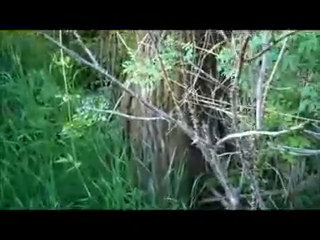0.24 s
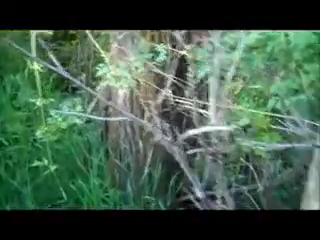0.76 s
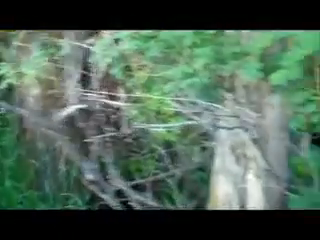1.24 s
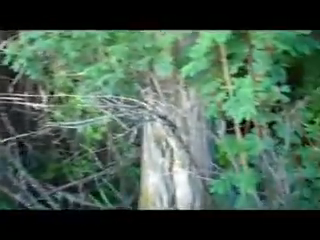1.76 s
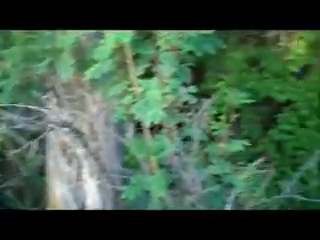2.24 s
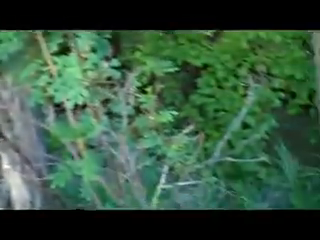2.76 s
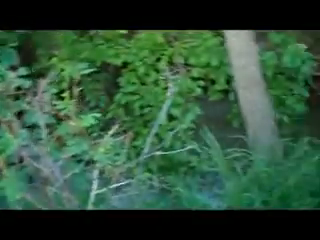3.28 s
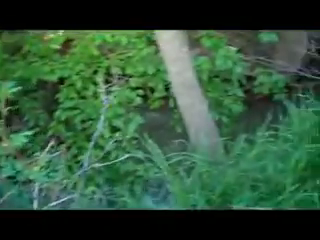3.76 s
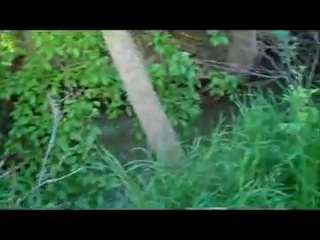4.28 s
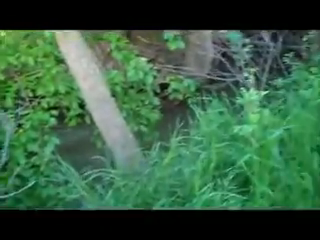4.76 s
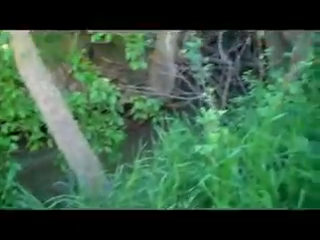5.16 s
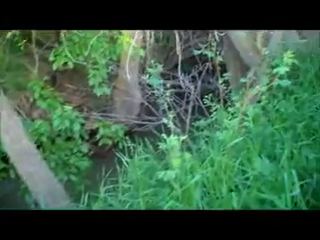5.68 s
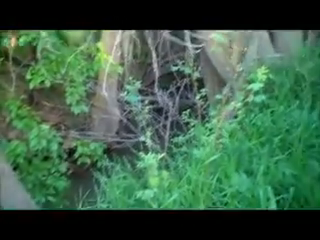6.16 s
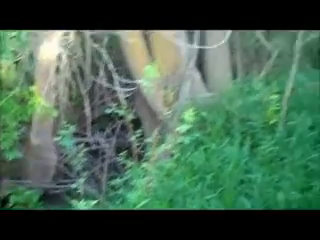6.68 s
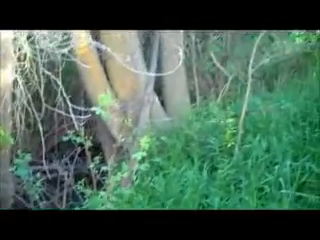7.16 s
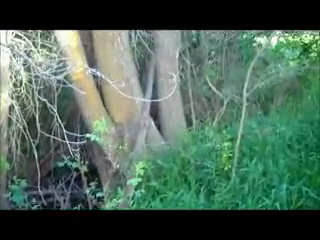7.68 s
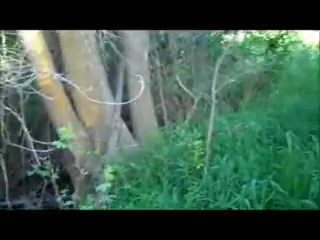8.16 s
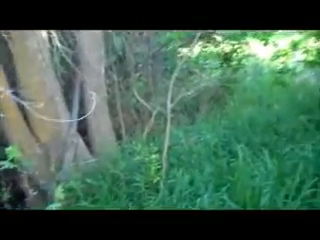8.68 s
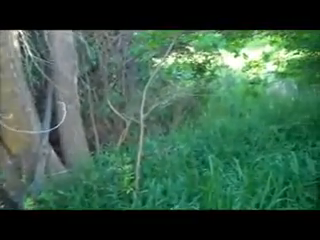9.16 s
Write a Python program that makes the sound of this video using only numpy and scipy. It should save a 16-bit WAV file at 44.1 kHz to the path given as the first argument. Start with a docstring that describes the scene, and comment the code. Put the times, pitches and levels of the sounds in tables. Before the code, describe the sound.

Water pours steadily over a gate into a ditch outdoors, a dense bubbling roar with small splashes and soft breeze thuds on the right.

```python
"""From the first moment water pours over a farm gate into an irrigation ditch: noise roars, bubbles ring over it.
Air thuds softly on the right microphone port from the start; brief treble lifts splash out until 5.6 s.
From about 2 s the water pulls left as the camera pans right, its left port leading by up to 0.1 ms.
The lows below 400 Hz dip or lift briefly on either port, deepest on the left at 3.4 s and 8.7 s.
After 8 s a few strong puffs reach the left too. Weak bands thin out for moments, leaving the sound patchy."""
import sys
import numpy as np
from scipy import signal
from scipy.fft import rfft, irfft, next_fast_len
from scipy.io import wavfile
from scipy.ndimage import uniform_filter1d

SR = 44100
rng = np.random.default_rng(int(sys.argv[2]) if len(sys.argv) > 2 else 0)


def transcribe(signal):
    """Save signal, clipped to [-1, 1], as a 16-bit WAV file at the path in sys.argv[1]."""
    frames = np.atleast_2d(signal).T
    limited = np.clip(frames, -1, 1)
    pcm = np.round(limited * 32767).astype(np.int16)
    wavfile.write(sys.argv[1], SR, pcm)


N = 415422
FRAME, HOP = 1024, 256  # short-time spectra, in samples
HZ = np.fft.rfftfreq(FRAME, 1 / SR)

# Colour of the falling water. Each row: pitch in [Hz], relative level in [dB].
WATER_COLOUR = [(40, -54), (90, -16.5), (130, -8.5), (170, -3), (220, 1.1), (310, 3), (460, 7), (590, 6.5),
                (750, 6), (950, 1.8), (1350, 3), (1900, 0.32), (2500, 0.4), (4000, -2), (6000, 0.5)]
# Splashes out of the rush. Each row: centre in [s], treble lift in [dB], half-length in [s].
SPLASHES = [(0.146, 1.5, .05), (0.65, 1.5, 0.016), (1.518, 1, .03), (1.96, 2.3, 0.024), (2.254, 2, 0.021),
            (2.676, 2.5, 0.019), (3.308, 2.5, .012), (4.4, 2.5, 0.01), (5.64, 2, 0.035)]
# The pan. Each row: time in [s], lead of the left port in [ms], shading in [dB], delay of the bank's echo in [ms],
# strength of the bank's echo [0-1], strength of the ground's echo [0-1].
CAMERA_PAN = [(0, 0.006, -0.5, 1.02, 0.62, 0.33), (1.7, 0.0033, 0.3, 1.015, 0.66, 0.41),
              (2.5, 0.024, -1, 1.015, 0.57, 0.48), (4, 0.069, 1, 1.004, 0.5, 0.35),
              (5.5, 0.057, 0, 0.97, 0.5, 0.36), (6.4, 0.083, 0, 0.99, 0.42, 0.33),
              (6.65, 0.097, 0.8, 0.99, 0.49, 0.32), (8, 0.1, -1, 0.91, 0.41, 0.29),
              (9.42, 0.097, -1.8, 0.88, 0.4, 0.14)]
# How much of the shading each pitch takes. Each row: pitch in [Hz], share [a factor, negative inverts].
SHADING_SHARE = [(500, -0.38), (1400, 0.28), (2400, 0.22), (5200, 0.65), (7000, 0.19)]
# Likeness of the two ports, the rest being scattered by trees. Each row: pitch in [Hz], correlation [0-1].
PORT_LIKENESS = [(100, 0.3), (250, 0.63), (900, 0.61), (1600, 0.57), (2500, 0.52), (4400, 0), (4600, 0.48),
                 (6600, 0.92), (7000, 0.03), (8000, 0.2)]
# Moments when the lows dip or lift briefly on either port. Each row: centre in [s], dip on the left in [dB],
# dip on the right in [dB], half-length in [s]; a negative dip is a lift.
LOW_DIPS = [(.3, 1, 2, 0.63), (1.2, 4, 7, 0.05), (1.62, 5, 4, 0.05), (3.387, 18, 2, 0.042),
            (3.48, -4, 2, .025), (3.85, 9, -2, .035), (3.96, 12, 9, 0.045), (4.363, 3, 6, .025),
            (4.747, 14, 0, .03), (5.153, -2, 6, 0.035), (5.297, 11, 3.5, 0.04), (5.697, 10, 2, .03),
            (6.564, 8, 2, .03), (7.268, 9, 5, .05), (7.8, 1, 0, .035), (8.24, 9, 5, 0.042),
            (8.403, 13, 8, 0.023), (8.71, 23, 1, 0.059), (9.35, 4, 7, .02)]
# How far up such a dip reaches. Each row: pitch in [Hz], share of the dip [0-1].
LOW_DIP_REACH = [(160, 1), (260, 0.38), (400, 0), (800, 0)]
# The band that stays centred, neither port leading: lower edge in [Hz], upper edge in [Hz].
CENTRED_BAND_HZ = (4520, 6800)
# Single puffs of air on the ports. Each row: centre in [s], left level in [dB], right level in [dB].
PUFFS = [(0.046, -68, -42), (0.105, -74, -35), (0.268, -70, -43), (0.334, -70, -40), (0.465, -70, -39),
         (0.515, -70, -38), (0.824, -70, -41), (1.529, -67, -38), (1.69, -70, -43), (1.738, -70, -43),
         (2.046, -70, -46), (2.193, -70, -41), (2.551, -65, -43), (2.891, -66, -47), (3.046, -70, -43),
         (3.145, -70, -39), (3.244, -70, -45), (3.323, -70, -45), (3.379, -70, -43), (3.601, -69, -46),
         (3.832, -70, -46), (4.893, -62, -42), (5.387, -70, -42), (5.435, -70, -49), (5.517, -66, -43),
         (5.719, -70, -41), (6.064, -70, -47), (6.127, -70, -45), (6.234, -70, -46), (6.415, -70, -46),
         (6.683, -67, -40), (6.756, -68, -36), (6.93, -70, -41), (7.286, -70, -42), (7.359, -70, -41),
         (7.529, -70, -41), (7.611, -70, -39), (7.66, -70, -41), (7.746, -70, -48), (8.1, -36, -37),
         (8.223, -70, -42), (8.273, -70, -41), (8.503, -70, -37), (8.57, -70, -44), (8.64, -70, -43),
         (8.699, -70, -40), (8.75, -70, -43), (8.857, -37, -47), (8.997, -38, -45), (9.097, -36, -44)]
# How busy the breeze is with further puffs. Each row: time in [s], rate in [puffs per s].
BREEZE_RATE = [(0, 5), (1.0, 0.93), (3.3, 2.5), (4.0, 1.1), (4.6, 1.76), (5.1, 1.4), (5.7, 4.5),
               (6.55, 3.55), (7.6, 4.5), (9.42, 4.9)]
# Colour of moving air on a port. Each row: pitch in [Hz], relative level in [dB].
PUFF_COLOUR = [(15, -1), (35, -2), (70, 15.5), (120, 10.5), (190, 3), (400, -30), (1500, -82)]
# Response of the left port. Each row: pitch in [Hz], gain in [dB].
LEFT_PORT = [(100, -4), (4500, 0.5), (5500, -0.5), (6500, 2), (7050, 8), (7520, 9), (8050, 5), (9100, -1.5),
             (9800, -5.5), (10800, -24)]
# Response of the right port. Each row: pitch in [Hz], gain in [dB].
RIGHT_PORT = [(100, -3.5), (220, -5), (500, -3), (1200, -3.5), (2400, -3.5), (4400, -2.5), (5500, -1),
              (6100, 0.5), (6700, 2.5), (7050, -4.5), (7900, -14.5), (8650, -34), (9200, -70)]
# Level below which a band thins out; the last pitch is the upper end. Each row: pitch in [Hz], level in [dB].
THIN_THRESHOLD = [(60, -53), (150, -44.6), (300, -44.5), (550, -45.2), (1050, -44.2), (1500, -45),
                  (2200, -44.4), (4000, -44.7), (5500, -45.3)]
# How far a thinned band is turned down. Each row: pitch in [Hz], cut in [dB].
THIN_CUT = [(40, 10), (80, 21), (130, 32), (500, 30), (1000, 24), (2600, 16), (5500, 13)]
# Offset of the thinning threshold on each port: left in [dB], right in [dB].
PORT_THRESHOLD_DB = [0.5, -5]

WATER_DB = -13  # level ahead of the colour
CHURN_FADE_DB_PER_S, SPRAY_FADE_DB_PER_S = 0.1737, 0.0944  # lows and treble, as the camera turns away
SURGE_DB, SURGE_S = 0.33, 0.41
GROUND_ECHO_MS = 0.52
DRIFT_DB_PER_S = 0.21  # growth of left over right during the pan
PUFF_S = 0.0706  # whole length of a puff
PUFF_DB, PUFF_SPREAD_DB = -53, 6  # level of a further puff at one puff a second, random scatter
STIFFEN_DB = 5.5  # growth of the further puffs for each doubling of their rate
LEE_DB = -23  # shelter of the left port from draught and further puffs
STILL_AIR_DB, DRAUGHT_DB = -68, -72  # constant rumble, rumble that follows the breeze (at one puff a second)
THIN_KNEE_DB = 0.53
EDGE_HZ = 10850  # upper band limit


def water():
    """The churn surges and swirls, and reaches the two ports directly, off the bank and through the trees."""
    direct, scattered = spectra(churn()), spectra(churn())
    t = np.arange(len(direct)) * HOP / SR
    lead_ms, shade_db, bank_ms, bank, ground = follow(CAMERA_PAN, t)
    field_db = water_motion_db(t, direct.shape) + shade_db * read(SHADING_SHARE, HZ)
    # the grassy bank and the ground return mostly lows, cutting hollows that change with the pan
    hollows = comb(bank_ms, bank, top_hz=1200) * comb(GROUND_ECHO_MS, ground, top_hz=1420)
    # outside the centred band the right port hears the water later
    spaced = (HZ < CENTRED_BAND_HZ[0]) | (HZ > CENTRED_BAND_HZ[1])
    lag = np.exp(-2j * np.pi * HZ * spaced * lead_ms / 1000)
    same = read(PORT_LIKENESS, HZ)
    common = np.sqrt((1 + same) / 2) * direct
    apart = np.sqrt((1 - same) / 2) * scattered
    ports = np.array([common + apart, (common - apart) * lag])
    ports = ports * hollows * gain_of(field_db - low_dips_db(t))
    sound = np.array([waveform(port) for port in ports])
    # the pan tips the balance towards the left
    drift_db = DRIFT_DB_PER_S * (np.arange(N) - N / 2) / SR * np.array([[.5], [-.5]])
    return gain_of(WATER_DB) * coloured(sound, WATER_COLOUR) * gain_of(drift_db)


def churn():
    """Countless merged bursts of foam are plain noise; gurgles, trickles and fine spray ring within it."""
    foam = rng.standard_normal(N)
    gurgle = bubbles(low_hz=169.7, high_hz=1482, per_s=450, cycles=5.1, spread_db=0.5, rise=0.017)
    trickle = bubbles(low_hz=901.0, high_hz=4997, per_s=520, cycles=30.9, spread_db=1.0, rise=0.0107)
    spray = bubbles(low_hz=2337, high_hz=9000, per_s=1800, cycles=2.64, spread_db=1.0, rise=0.039)
    return evened(foam + gain_of(-20.5) * gurgle + gain_of(-14.5) * trickle + gain_of(-10.0) * spray)


def bubbles(low_hz, high_hz, per_s, cycles, spread_db, rise, count=90):
    """Each trapped bubble rings for a few cycles and rises in pitch as it nears the surface."""
    out = np.zeros(N)
    for hz in np.geomspace(low_hz, high_hz, count):
        when, luck, chance = rng.random((3, 600))
        born = chance < per_s * N / SR / count / len(when)
        # higher bubbles ring louder; a few stand out by chance
        strengths = hz * gain_of(spread_db * np.minimum(-np.log(1 - luck), 3.5))
        age = np.arange(int(5 * cycles * SR / hz)) * hz / SR / cycles  # in decay times
        envelope = np.exp(-age) * (1 - np.exp(-10 * age))
        ring = envelope * np.sin(2 * np.pi * cycles * age * (1 + rise * age))
        for s, strength in zip((when[born] * N / SR).tolist(), strengths[born]):
            add(out, s, strength * ring)
    return evened(out)


def water_motion_db(t, shape):
    """The flow's level over time and pitch: a slow fade, random surges, splashes, flutter and swirls."""
    treble = read([(1500, 0), (5500, 1)], HZ)
    fade = (1 - treble) * CHURN_FADE_DB_PER_S + treble * SPRAY_FADE_DB_PER_S
    field_db = (t.mean() - t)[:, None] * fade
    field_db += SURGE_DB * eddies(shape, seconds=SURGE_S, width_hz=6300)
    splash_db = sum(db * np.exp(-((t - s) / length) ** 2) for s, db, length in SPLASHES)
    field_db += treble * splash_db[:, None]
    # sheets of water break up: broad flutter over narrower swirls, the finest ones varying in depth with pitch
    field_db += 0.38 * eddies(shape, seconds=0.0087, width_hz=27000)
    field_db += (0.82 + 0.07 * treble) * eddies(shape, seconds=0.0082, width_hz=410)
    swirl_db = read([(130, 2.6), (260, 1.76), (600, 2.9), (2000, 2.16), (5000, 1.97)], HZ)
    field_db += swirl_db * eddies(shape, seconds=0.0086, width_hz=19)
    # reflections from trunks and branches ripple the spectrum
    return field_db + 0.64 * eddies(shape, seconds=0.1, width_hz=35)


def low_dips_db(t):
    """Brief smooth dips or lifts of the lows, of different depth on each port."""
    dips = sum(np.outer([left, right], np.exp(-((t - s) / length) ** 2)) for s, left, right, length in LOW_DIPS)
    return dips[..., None] * read(LOW_DIP_REACH, HZ)


def eddies(shape, seconds, width_hz):
    """A smooth random field over time and pitch, rms 1, made by low-passing noise along both axes."""
    fast = np.fft.fftfreq(shape[0], HOP / SR)[:, None]
    fine = np.fft.rfftfreq(shape[1], SR / FRAME)
    smooth = np.exp(-(fine * width_hz) ** 2) / np.sqrt(1 + (2 * np.pi * fast * seconds) ** 4)
    return evened(np.fft.irfft2(np.fft.rfft2(rng.standard_normal(shape)) * smooth, shape))


def comb(delay_ms, strength, top_hz):
    """Gain by pitch of a sound joined by one dull echo, which reinforces some pitches and hollows out others."""
    echo = np.clip(strength, 0, .9) / (1 + (HZ / top_hz) ** 4)
    return abs(1 + echo * np.exp(-2j * np.pi * HZ * delay_ms / 1000)) / np.sqrt(1 + echo ** 2)


def breeze():
    """Eddies of air cross the ports as soft thuds over a faint draught, mostly on the exposed right one."""
    rumble = evened(coloured(rng.standard_normal((2, N)), PUFF_COLOUR))
    t = np.arange(N) / SR
    rate = follow(BREEZE_RATE, t)[0][:, 0]
    draught = gain_of([[DRAUGHT_DB + LEE_DB], [DRAUGHT_DB]]) * np.sqrt(rate)
    out = (gain_of(STILL_AIR_DB) + draught) * rumble
    for s, left_db, right_db in PUFFS:
        puff(out, rumble, s, left_db, right_db)
    passed = np.cumsum(rate) / SR  # eddies that have come by so far
    for k, (jitter, size) in enumerate(rng.standard_normal((int(passed[-1]), 2))):
        s = np.interp(k + .5 + 0.57 * jitter, passed, t)
        db = PUFF_DB + STIFFEN_DB * np.log2(np.interp(s, t, rate)) + PUFF_SPREAD_DB * size
        puff(out, rumble, s, db + LEE_DB, db)
    return out


def puff(out, rumble, s, left_db, right_db):
    """One short push of air on each port: a piece of rumble that swells and dies, centred on s."""
    swell = signal.windows.hann(int(PUFF_S * SR))
    start = min(round(s * SR), N - len(swell))
    push = swell * rumble[:, start:][:, :len(swell)]
    add(out, s - PUFF_S / 2, gain_of([[left_db], [right_db]]) * np.array([evened(port) for port in push]))


def gain_of(db):
    """Decibels to amplitude."""
    return 10 ** (np.asarray(db) / 20)


def evened(x):
    """Scales to rms 1."""
    return x / np.sqrt(np.mean(abs(x) ** 2) + 1e-20)


def read(points, hz):
    """Reads a spectrum on a log-frequency axis."""
    f, value = np.transpose(points)
    return np.interp(np.log(hz + 1), np.log(f + 1), value)


def follow(rows, t):
    """Reads every column of a curve table at the times t."""
    s, *columns = np.transpose(rows)
    return [np.interp(t, s, c)[:, None] for c in columns]


def add(mix, s, sound):
    """Mixes a sound in at time s."""
    part = mix[..., max(round(s * SR), 0):][..., :sound.shape[-1]]
    part += sound[..., :part.shape[-1]]


def coloured(x, points):
    """Filters by a spectrum in dB."""
    size = next_fast_len(N + FRAME)
    gain = gain_of(read(points, np.fft.rfftfreq(size, 1 / SR)))
    return irfft(rfft(x, size) * gain, size)[..., :N]


def spectra(x):
    """Short-time spectra, frames by bins."""
    return signal.stft(x, nperseg=FRAME, noverlap=FRAME - HOP)[2].T


def waveform(z):
    """Short-time spectra back to sound."""
    return signal.istft(z.T, nperseg=FRAME, noverlap=FRAME - HOP)[1][:N]


def scene():
    """The water and the air around the camera."""
    return water() + breeze()


def thin_weak_bands(x, threshold_db):
    """Turns each band down while its power is below a threshold, leaving the sound patchy."""
    z = spectra(x)
    power = uniform_filter1d(uniform_filter1d(abs(z) ** 2, size=5, axis=0), size=3, axis=1)
    excess_db = 10 * np.log10(abs(power) + 1e-14) - read(THIN_THRESHOLD, HZ) - threshold_db
    thinned = (1 - np.tanh(excess_db / THIN_KNEE_DB)) / 2  # 0 untouched, 1 fully turned down
    thinned = thinned * (HZ < THIN_THRESHOLD[-1][0])
    return waveform(z * gain_of(-read(THIN_CUT, HZ) * thinned))


def record(dry):
    """The left port rings in the treble, the right is duller; weak bands thin out, peaks clip, the top is cut."""
    heard = [coloured(dry[0], LEFT_PORT), coloured(dry[1], RIGHT_PORT)]
    heard = np.array([thin_weak_bands(port, db) for port, db in zip(heard, PORT_THRESHOLD_DB)])
    heard = np.clip(heard, -.9, .9)
    band_limit = signal.firwin(511, EDGE_HZ, window=("kaiser", 9), fs=SR)
    return signal.oaconvolve(heard, band_limit[None], "same", axes=1)


dry = scene()
out = record(dry)
transcribe(out)
```